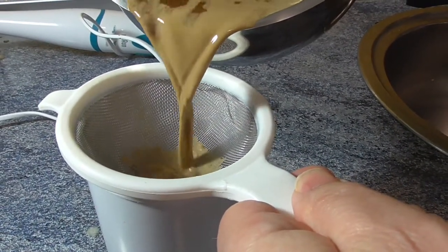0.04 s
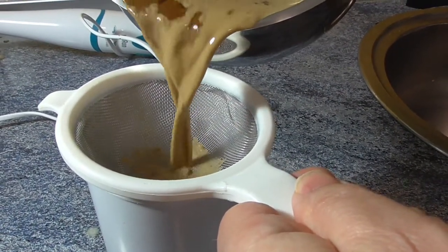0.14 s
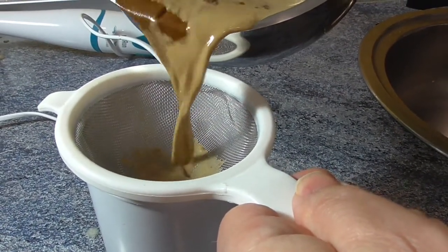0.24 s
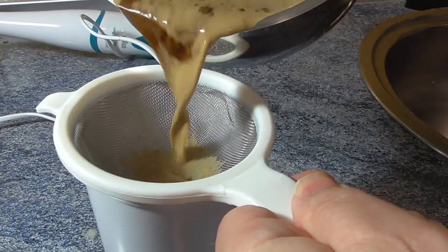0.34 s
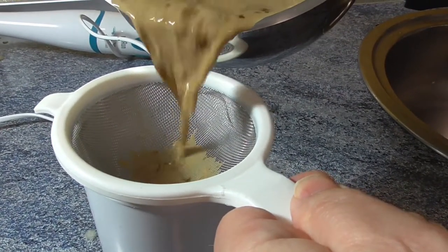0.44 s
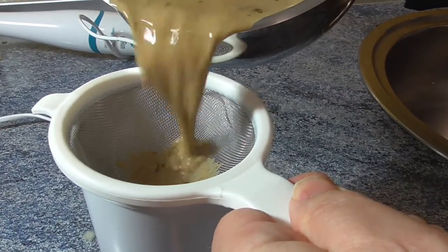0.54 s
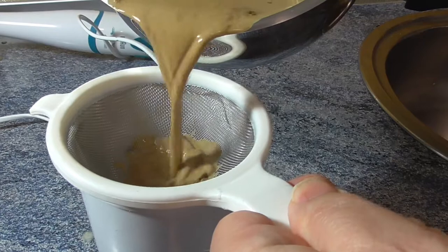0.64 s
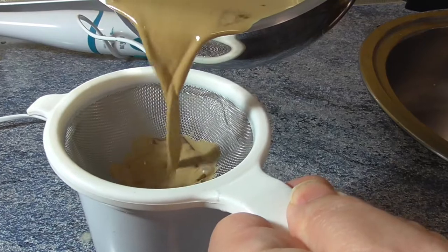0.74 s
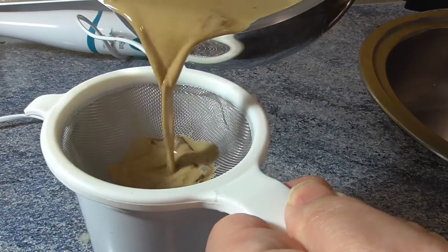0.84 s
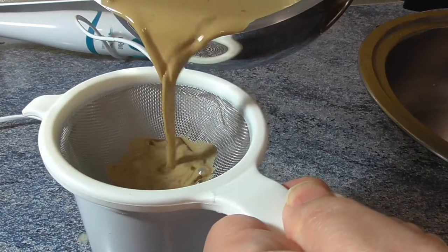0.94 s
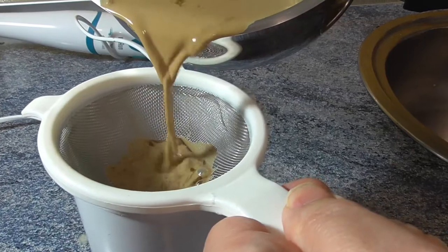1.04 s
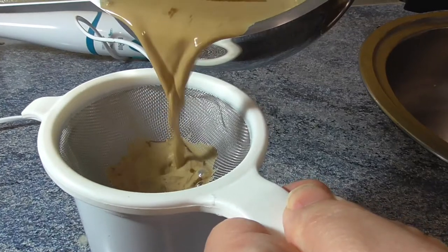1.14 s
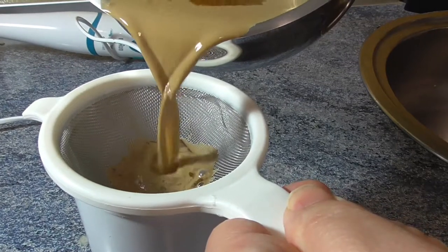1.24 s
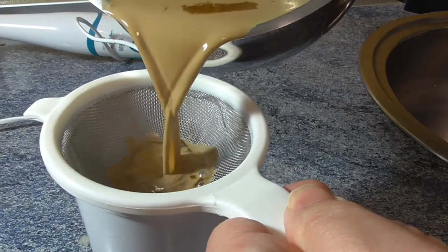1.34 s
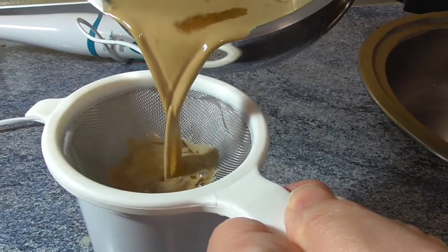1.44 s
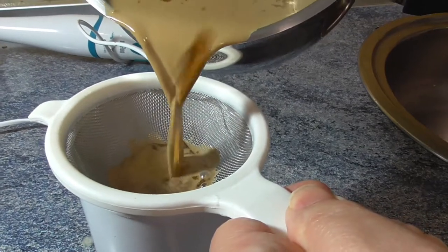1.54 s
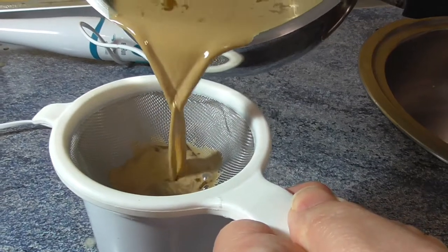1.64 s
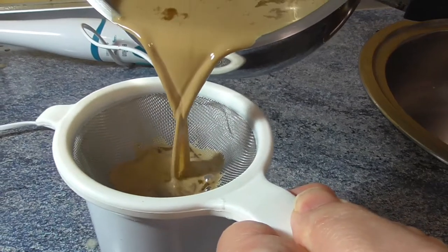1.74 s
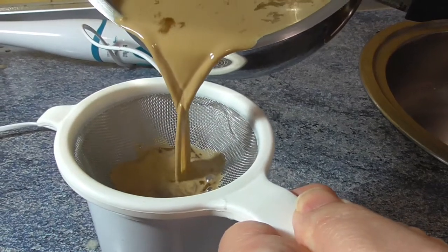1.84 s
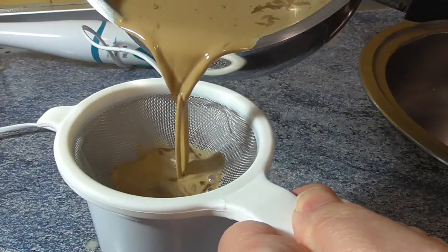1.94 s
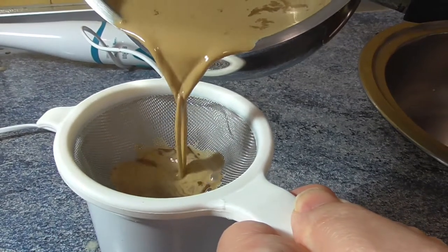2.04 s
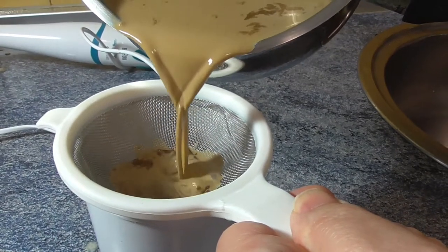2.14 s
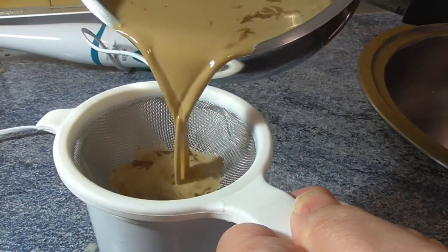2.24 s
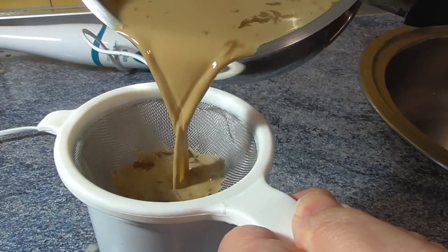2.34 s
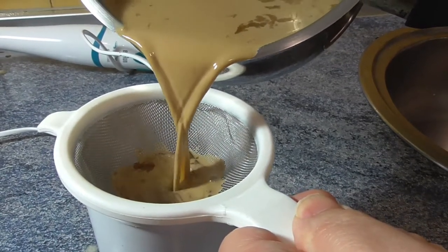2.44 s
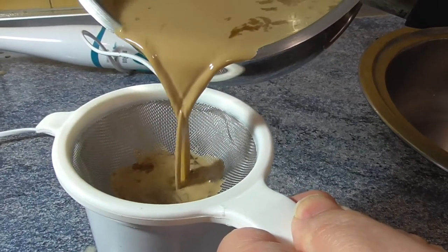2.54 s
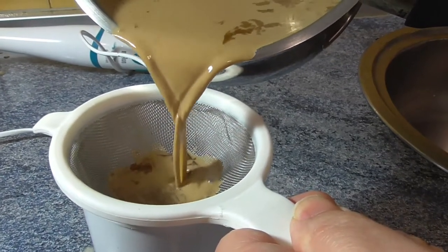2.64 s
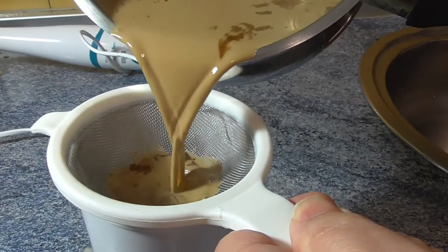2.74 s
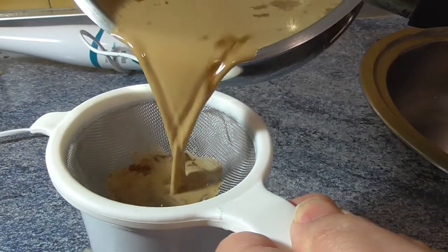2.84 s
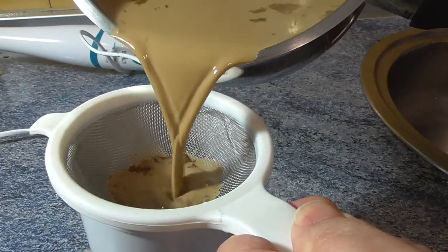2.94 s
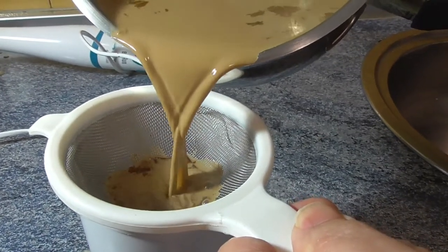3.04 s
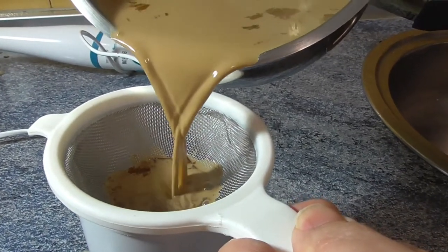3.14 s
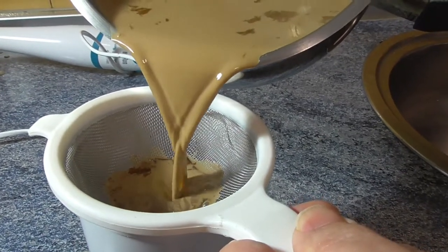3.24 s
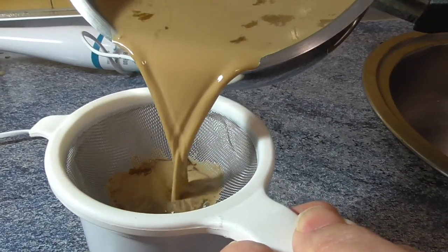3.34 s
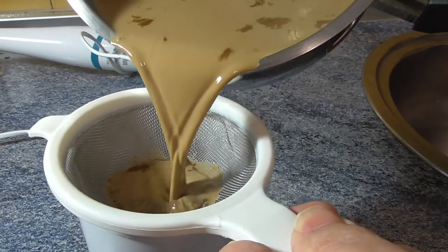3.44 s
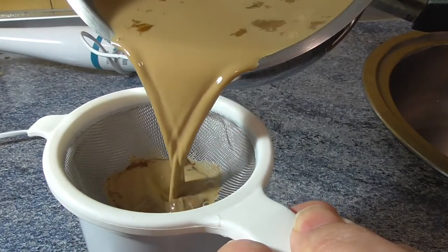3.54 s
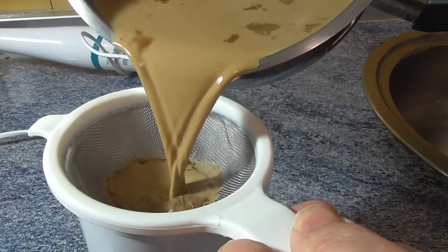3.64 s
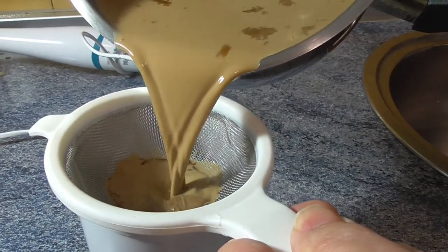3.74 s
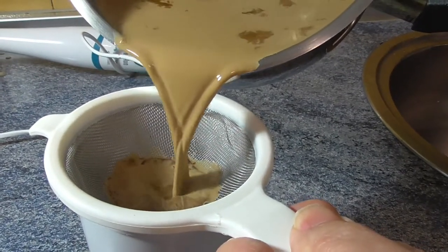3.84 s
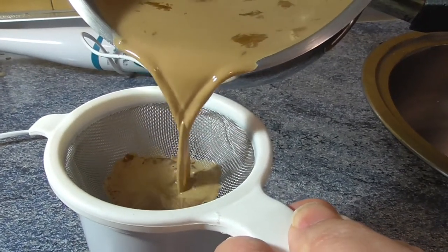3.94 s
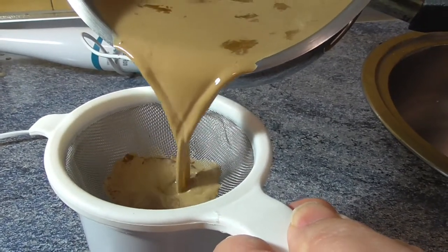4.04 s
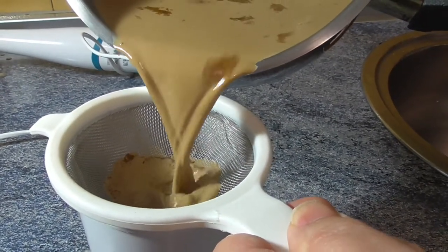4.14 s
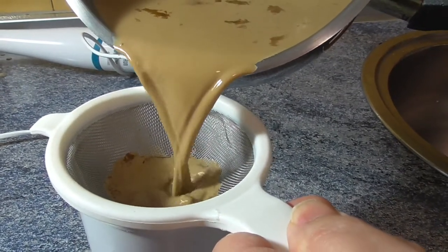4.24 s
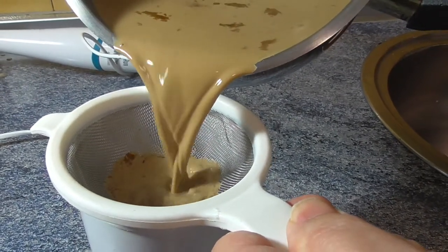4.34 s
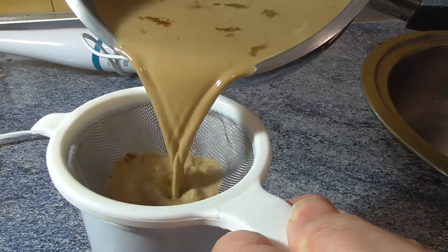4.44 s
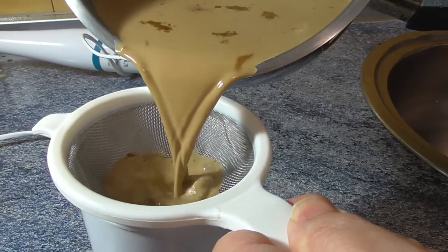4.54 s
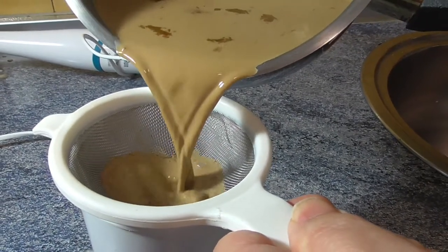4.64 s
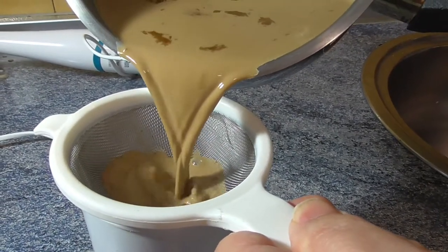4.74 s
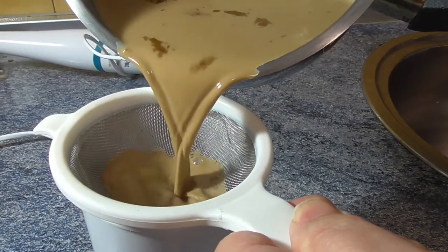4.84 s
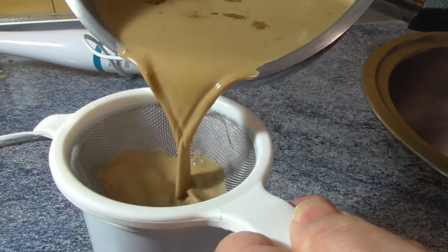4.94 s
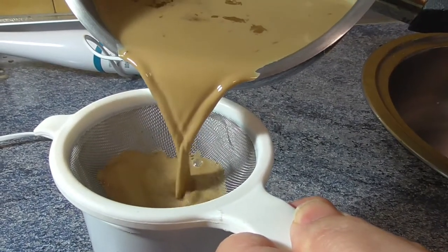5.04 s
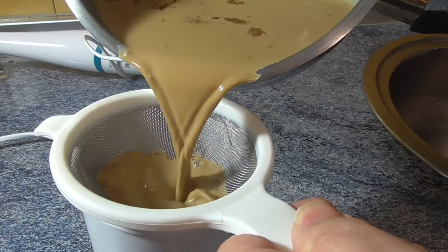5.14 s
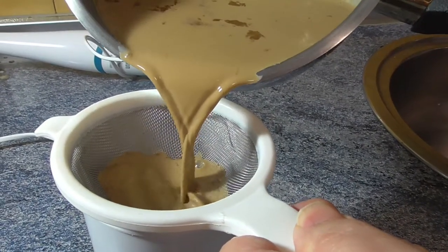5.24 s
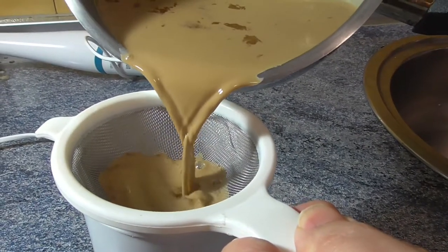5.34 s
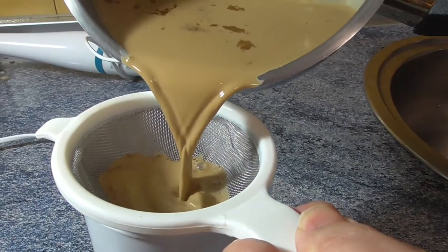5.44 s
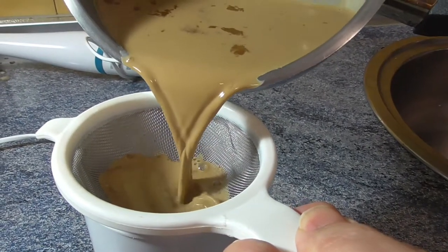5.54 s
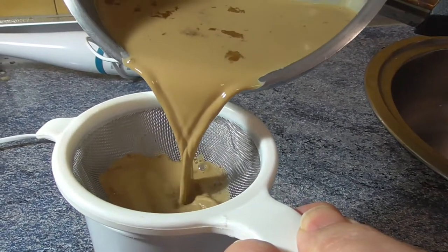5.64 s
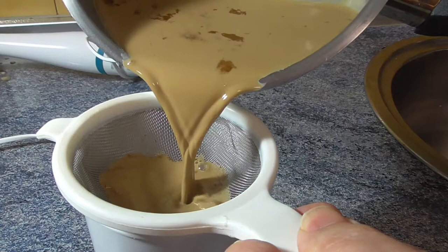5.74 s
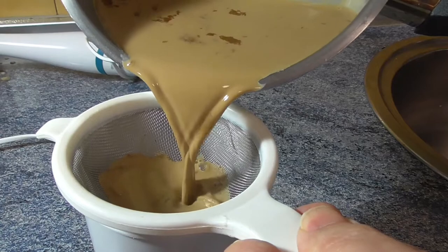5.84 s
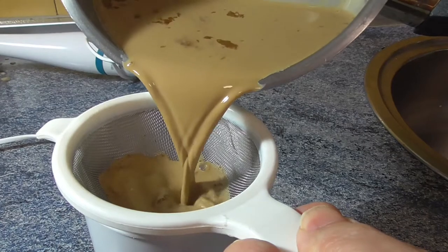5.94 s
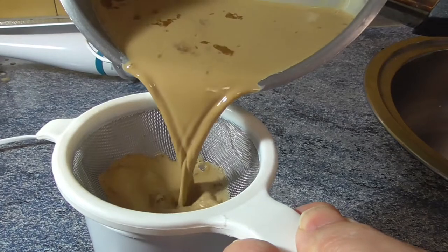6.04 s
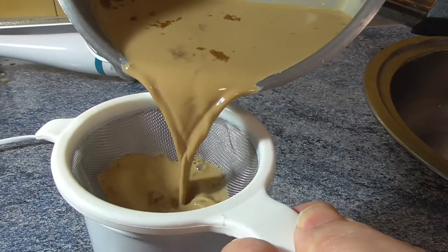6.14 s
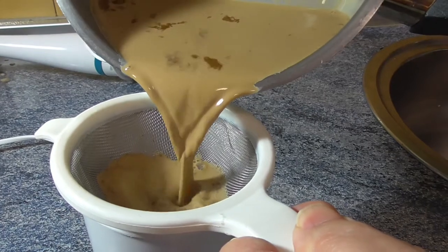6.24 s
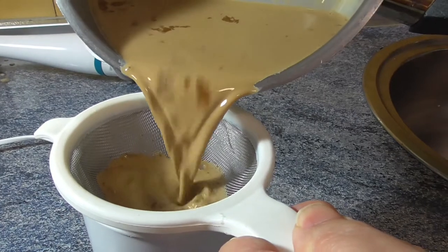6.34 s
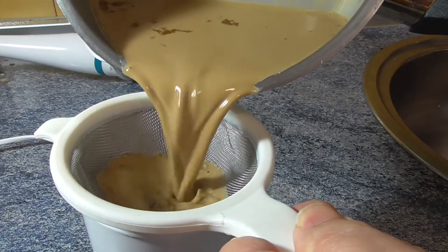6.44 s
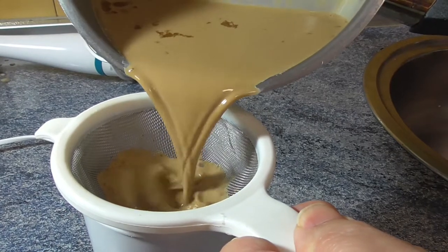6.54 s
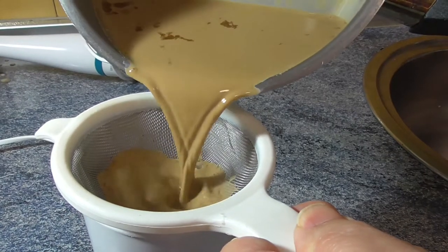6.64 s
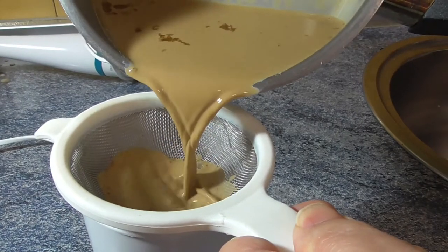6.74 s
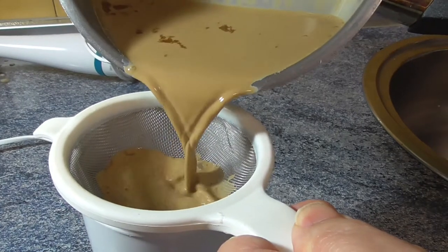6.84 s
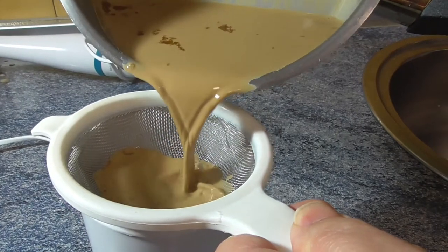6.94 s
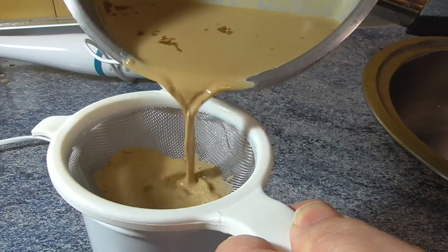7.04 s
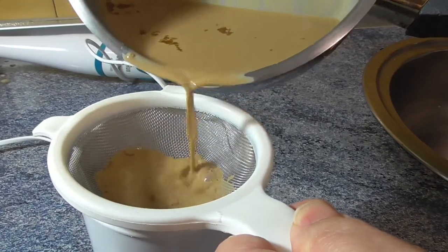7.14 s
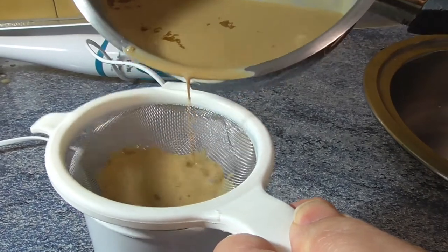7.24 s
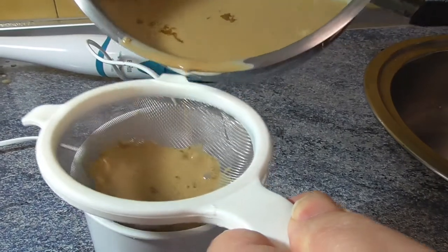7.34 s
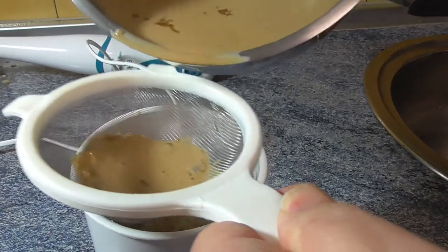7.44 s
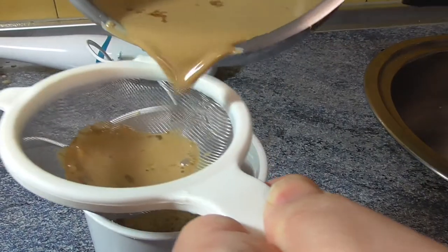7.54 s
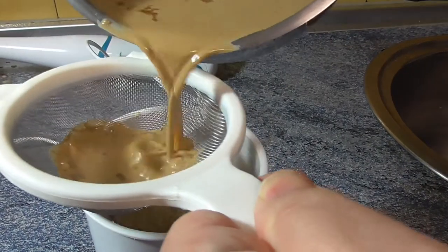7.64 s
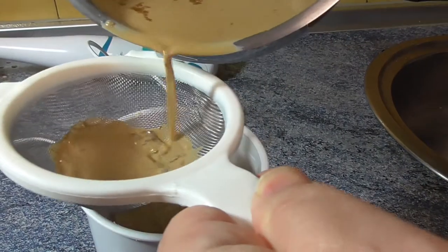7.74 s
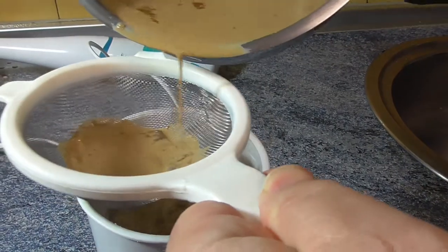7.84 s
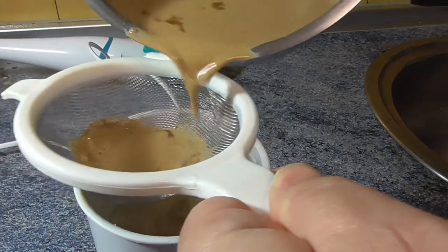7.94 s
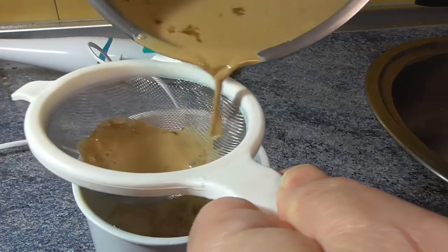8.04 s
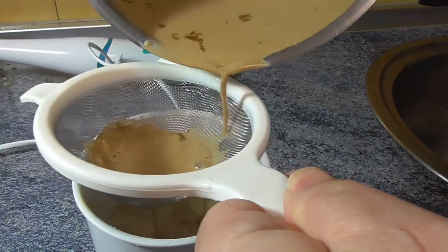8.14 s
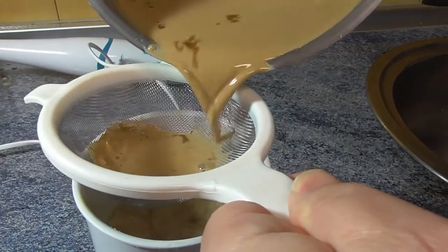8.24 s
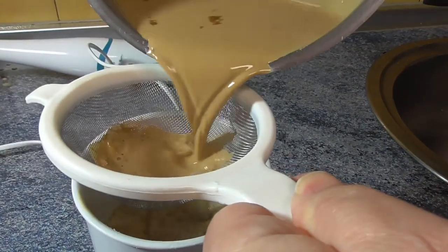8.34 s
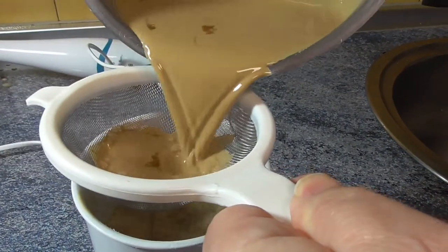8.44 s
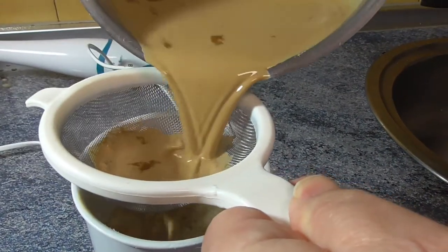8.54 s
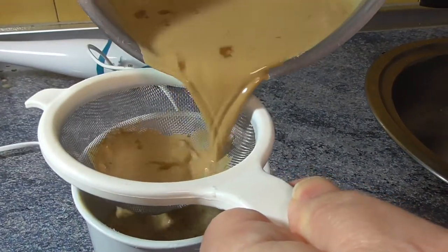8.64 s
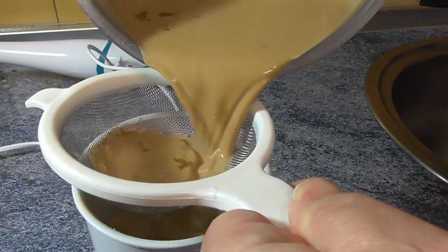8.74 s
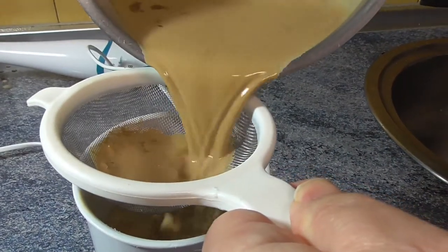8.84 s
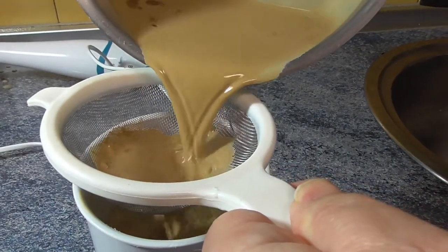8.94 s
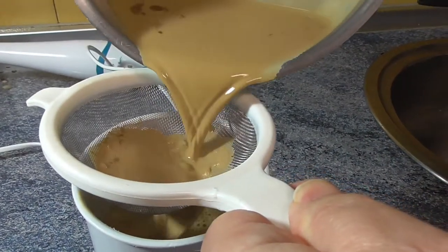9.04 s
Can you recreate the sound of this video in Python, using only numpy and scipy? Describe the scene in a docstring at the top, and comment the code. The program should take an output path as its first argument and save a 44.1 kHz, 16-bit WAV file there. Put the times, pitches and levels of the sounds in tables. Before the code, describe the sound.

Close-up kitchen pour: dense hollow plopping and bubbly crackle in a plastic jug thins out, nearly stops, then restarts with soft gulps.

```python
"""Drops patter and fine bubbles fizz as thick soup runs through a mesh strainer into a plastic jug.
Heavy blobs knock, ring base, wall and air column (struck modes) and thump the worktop.
As the jug fills, the base ring weakens and mostly sinks in pitch; bubbles tick in the mesh (short rings).
The strainer is lifted with a soft rumble (coloured noise); the pour restarts with gulps that slide down.
A short room echo and faint coloured noise lie around it all."""
import sys
import numpy as np
from scipy import signal
from scipy.fft import rfft, irfft
from scipy.io import wavfile
from scipy.ndimage import uniform_filter1d

SR = 44100
rng = np.random.default_rng(int(sys.argv[2]) if len(sys.argv) > 2 else 0)


def pcm_store(signal):
    """Save signal as 16-bit PCM."""
    levels = np.round(np.clip(np.atleast_2d(signal), -1, 1) * 32767)
    wavfile.write(sys.argv[1], SR, levels.astype(np.int16).T)


N = 401310
TOP_HZ = 16000
TIME_S = np.arange(N) / SR
AGE_S = np.arange(SR // 8) / SR  # time since a blow

# Levels are relative; some sources add a trim.
# small drops from the mesh: [t/s, level/dB]
PATTER_LEVEL = [(0, -34), (.25, -47), (.57, -38), (.73, -56.5), (.9, -44), (1.12, -42.5), (1.42, -57.5),
                (1.66, -44.5), (1.95, -51), (2.35, -48.5), (3.7, -46.5), (4.3, -57.5), (5.15, -56.5),
                (5.62, -61), (5.9, -58), (6.55, -74), (6.78, -54.5), (7.05, -62), (8.45, -61), (9.1, -44.5)]
# soup pressing through the mesh: [t/s, fizz level/dB]
FIZZ_LEVEL = [(0, -56), (.55, -50.5), (.73, -65.5), (.88, -56), (1.6, -61), (2.0, -69), (2.4, -58),
              (2.95, -63.5), (3.55, -56.5), (3.9, -58), (4.15, -71), (4.42, -62.5), (5.0, -73.5),
              (5.45, -65.5), (5.7, -78), (6.25, -71), (6.82, -63), (7.0, -73.5), (8.35, -76), (9.1, -57.5)]
# coarse bubbles where the soup lands: [t/s, level/dB]
GURGLE_LEVEL = [(0, -40.5), (.55, -49.5), (.73, -67), (.9, -44), (1.3, -46.5), (2.0, -48.5), (2.4, -51),
                (3.6, -46), (4.2, -55), (4.55, -50), (4.97, -51), (5.2, -48), (5.65, -59.5), (5.85, -55),
                (6.8, -55.5), (7.101, -58.5), (8.298, -62.5), (9.1, -51)]
# large blobs landing: [t/s, knock level/dB, hollow low ring level/dB, wet slap level/dB]
BLOBS = [(.0247, -29, -68, -36), (.1066, -25.5, -56, -58), (0.173, -31, -40, -38), (.226, -39, -53, -59),
         (.310, -36, -51, -38), (.3407, -27, -38, -32), (.3685, -27, -39.5, -42), (.4336, -20.5, -34, -43),
         (.485, -30.5, -59, -32.5), (.5154, -29.5, -61, -35), (.5634, -36.5, -58, -63),
         (.584, -31, -41, -40), (.630, -23, -39, -35.5), (.7745, -27, -38, -42.5),
         (.8184, -31.5, -38, -35.5), (0.865, -24, -37, -35), (.8945, -31, -50, -42),
         (0.928, -21, -35.5, -36), (.9707, -30.5, -61, -45), (1.0625, -31.5, -63, -37),
         (1.0863, -27, -49, -35.5), (1.1563, -19, -36.5, -44), (1.217, -30.5, -67, -57),
         (1.2873, -26.5, -40.5, -33.5), (1.3296, -29, -55, -62), (1.3843, -31.5, -46, -59),
         (1.476, -33, -48, -43), (1.519, -31.5, -42, -39), (1.552, -30.5, -42, -45),
         (1.5821, -23.5, -40, -63), (1.747, -32, -59, -48), (1.824, -36, -65, -38),
         (1.9576, -37.5, -46, -68), (2.072, -39.5, -55, -54), (2.1699, -30, -36.5, -39),
         (2.2626, -31, -44, -49), (2.297, -34, -43, -52), (2.314, -32.5, -40, -40),
         (2.432, -42.5, -62, -44), (2.5568, -28.5, -36.5, -41), (2.644, -36, -45, -46),
         (2.827, -26.5, -37.5, -39.5), (3.000, -35.5, -43, -43), (3.132, -29.5, -57, -44),
         (3.1728, -27.5, -35.5, -40), (3.64, -24.5, -32.5, -47), (3.850, -34, -42, -35),
         (3.939, -40, -60, -42), (3.981, -33.5, -37, -62), (4.048, -38.5, -66, -41), (4.096, -37, -42, -51),
         (4.164, -44, -50, -44.5), (4.211, -41.5, -48, -46), (4.240, -42, -51, -46), (4.555, -43, -47, -53),
         (4.794, -44, -44, -44.5), (4.8449, -33, -41, -35.5), (4.874, -35.5, -48, -54),
         (5.0156, -20.5, -32, -43.5), (5.047, -24.5, -35.5, -44.5), (5.105, -31.5, -39.5, -39.5),
         (5.147, -39.5, -54, -45), (5.337, -37, -42.5, -35), (5.376, -26, -34.5, -36.5),
         (5.699, -27.5, -36.5, -47.5), (5.7987, -33, -41, -45), (5.815, -32, -38.5, -49),
         (5.843, -33.5, -44, -41), (5.9145, -32, -37.5, -60), (5.984, -37.5, -48, -50),
         (6.2027, -29.5, -41, -36), (6.344, -31, -44, -35), (6.870, -42, -55, -45.5),
         (6.941, -27.5, -37, -48), (7.805, -46, -54, -51), (7.934, -40.5, -75, -48),
         (8.044, -41.5, -56, -68), (8.185, -42, -50, -53), (8.223, -35.5, -42, -56),
         (8.255, -35.5, -62, -58), (8.387, -38, -47, -38), (8.393, -36, -44, -40.5), (8.452, -35, -63, -58),
         (8.5449, -32.5, -41, -38.5), (8.639, -28.5, -42, -40.5), (8.668, -31, -38, -44),
         (8.731, -33, -50, -38.5), (8.843, -39.5, -40, -63), (8.923, -28, -41, -47),
         (8.9533, -35, -46, -40.5), (8.997, -35, -62, -58), (9.050, -26.5, -40, -32.5),
         (9.074, -28, -47, -31)]
# knock pitch, rising overall as the jug fills: [t/s, f/Hz]
KNOCK_PITCH = [(0, 683), (1.0, 660), (2.3, 767), (3.2, 770), (3.8, 880), (5.1, 793), (5.8, 844), (7, 990),
               (9.1, 1090)]
# jug as it fills: [t/s, air f/Hz, base f/Hz, base re knock/dB, wall re knock/dB,
#                   worktop thump re air ring/dB, knock time constant/ms]
JUG_FILL = [(0, 378.7, 679, 2, -7, -0.5, 0.56), (1.7, 362, 675.6, 2, -25, 0, 0.41),
            (2.8, 355, 667, -1.5, -42, -4, 0.4), (3.6, 335, 682, -6, -56, -4.5, 0.45),
            (5, 323, 610, -16.5, -58, -10, 0.51), (6.4, 309, 571, -19, -18, -12, 0.4),
            (6.9, 311, 590, -13, 1, -13.5, 0.34), (9.1, 309.4, 565, -11, 1, -10, 0.74)]
# knock bouncing between jug, pan and worktop: [delay/ms, level/dB]
BOUNCES = [(3.1, -4.5), (5.7, -8), (9.2, -48), (12, -10)]
# low resonances of the worktop: [f/Hz, t60/s, level/dB]
WORKTOP_MODES = [(121, 0.23, -4), (127.6, .13, 16.5), (153.3, 0.12, 12)]
# distinct bubble ticks in the mesh, loud ones and fainter ones in the quieter stretches:
# [t/s, level/dB, f/Hz]
TICKS = [(0.0868, -29, 9700), (0.206, -33, 9900), (.2266, -29, 9900), (.318, -36, 6080), (0.361, -32, 7900),
         (0.522, -33, 8850), (.610, -32.5, 8700), (0.634, -29.5, 10700), (.817, -35.5, 6750),
         (.864, -35.5, 9900), (1.043, -31.5, 7250), (1.247, -33.5, 10800), (1.354, -35.5, 9500),
         (1.546, -32.5, 8260), (1.6004, -23.5, 10700), (2.152, -43, 6950), (2.017, -50.5, 3480),
         (2.509, -35, 10100), (2.555, -25.5, 8440), (3.091, -31, 12500), (3.1742, -23.5, 13300),
         (3.316, -36, 9600), (3.537, -31, 8940), (3.697, -30, 8800), (3.875, -36.5, 8700),
         (3.912, -35.5, 13300), (3.983, -24, 8800), (4.164, -45, 12200), (4.267, -35.5, 7450),
         (4.277, -33, 9600), (4.325, -31.5, 8700), (4.398, -34.5, 9300), (4.427, -37.5, 7400),
         (4.448, -43, 7640), (4.4665, -43, 11700), (4.544, -50, 2080), (4.625, -49.5, 4300),
         (4.749, -39, 10500), (4.8, -40.5, 8700), (4.930, -41.5, 9100), (5.096, -43, 7600),
         (5.199, -47.5, 4250), (5.352, -38.5, 8050), (5.363, -35.5, 9400), (5.541, -43, 8340),
         (5.91, -30, 11800), (5.9137, -23.5, 8700), (6.131, -44, 8400), (6.2192, -34, 9800),
         (6.275, -42, 6950), (6.502, -45, 9700), (6.535, -40, 11100), (6.604, -37, 10000),
         (6.641, -43, 5050), (6.811, -37.5, 8300), (6.856, -43, 10900), (7.261, -38, 13000),
         (7.913, -42.5, 7950), (8.126, -43.5, 10600), (8.424, -48.5, 5650), (8.510, -52, 3600),
         (8.533, -42.5, 3900), (8.545, -43, 3800), (8.952, -44, 2450), (8.998, -31.5, 7900),
         (9.057, -30, 9000)]
# strainer being lifted: [t/s, rumble level/dB]
LIFT_LEVEL = [(7.25, -70), (7.285, -56.5), (7.39, -53.5), (7.44, -69), (7.5, -52), (7.6, -59), (7.7, -68),
              (7.8, -66)]
# thick gulps once the pour restarts: [t/s, level/dB, starting f/Hz]
GULPS = [(8.125, -46, 1140), (8.151, -40.5, 1106), (8.423, -40.5, 1150), (8.806, -35.5, 844),
         (8.895, -30, 793), (8.968, -37, 1310)]
# spectrum of the quiet kitchen: [f/Hz, level/dB per Hz]
QUIET_SPECTRUM = [(15, -44), (25, -16), (120, 5), (175, 2.5), (309, 4.5), (489, -3), (936, 0),
                  (1700, -17.5), (2110, -18.5), (2760, -21), (3920, -15.5), (6210, -22), (8360, -15),
                  (11600, -16.5), (16000, -26)]
# spectrum of fine bubbles in the mesh: [f/Hz, level/dB per Hz]
FIZZ_SPECTRUM = [(600, -24.5), (1300, 4), (1700, 0.5), (2100, -12), (2800, -5), (3600, -5), (5000, -1.5),
                 (6400, -4), (7200, 7), (7700, -0.5), (8400, 5.5), (11000, 1), (12500, 5), (16000, -16.5)]
# spectrum of coarse bubbles: [f/Hz, level/dB per Hz]
GURGLE_SPECTRUM = [(500, -7), (1200, -0.5), (1700, -11.5), (2100, -0.5), (2800, -12.5), (3600, -5.5),
                   (6000, -20), (16000, -32)]
# spectrum of wet slaps and spatter: [f/Hz, level/dB per Hz]
SLAP_SPECTRUM = [(700, -73), (1250, 19), (1750, -3), (2050, 9.5), (2400, 7.5), (2800, 1.5), (3600, 6.5),
                 (5500, 0.5), (8500, 5.5), (12500, 1.5), (16000, -21)]
# spectrum of the strainer's rumble: [f/Hz, level/dB per Hz]
RUMBLE_SPECTRUM = [(40, -24), (85, -2), (170, 0.5), (260, -8.5), (550, -12.5), (900, -18), (2000, -32)]


def undb(db):
    """Decibels to gain."""
    return 10 ** (np.asarray(db) / 20)


def curve(table, at_s):
    """Columns of a table of (t/s, ...) rows, interpolated at the given times."""
    t_s, *columns = np.transpose(table)
    return [np.interp(at_s, t_s, column) for column in columns]


def add(track, t_s, sound):
    """Mix a sound into a track from t_s on, cut at the track's end."""
    start = max(int(t_s * SR), 0)
    room_left = track[..., start:start + sound.shape[-1]]
    room_left += sound[..., :room_left.shape[-1]]


def peak(x):
    """Scale to a peak of 1."""
    return x / np.abs(x).max()


def steady(x, size=SR // 5):
    """Even out the level to an rms near 1, from power smoothed over 0.2 s, then 0.1 s."""
    power = uniform_filter1d(np.mean(np.atleast_2d(x) ** 2, axis=0), size)
    return x / np.sqrt(uniform_filter1d(power, size // 2) + 1e-12)


def colour(x, spectrum):
    """Minimum-phase filter with the given (f/Hz, level/dB) shape and unit power gain."""
    size = 4096
    hz, db = np.transpose(spectrum)
    bin_hz = np.arange(size // 2 + 1) * SR / size
    log_gain = np.log(undb(np.interp(np.log(bin_hz + 1), np.log(hz), db)))
    # fold the cepstrum to make the response causal
    cepstrum = irfft(log_gain)
    cepstrum[1:size // 2] *= 2
    cepstrum[size // 2 + 1:] = 0
    response = irfft(np.exp(rfft(cepstrum)))
    response /= np.linalg.norm(response)
    return signal.fftconvolve(np.atleast_2d(x), response[None], axes=1)[:, :N]


def mode(hz, t60_s, age_s=AGE_S):
    """One struck resonance: a sine losing 60 dB in t60_s."""
    return np.sin(2 * np.pi * hz * age_s) * np.exp(-np.log(1000) * age_s / t60_s)


def pan(x, left_over_right_db):
    """Place a sound by the level difference between left and right."""
    return x * undb(np.array([[left_over_right_db], [-left_over_right_db]]) / 2)


def wide_noise(size, side_db):
    """Two channels of noise: a common part and a weaker opposed part."""
    mid, side = rng.standard_normal((2, size))
    return mid + undb(side_db) * side * np.array([[1], [-1]])


def quiet(level_db=-62.5):
    """Steady coloured noise of the quiet kitchen, wide in stereo."""
    return colour(wide_noise(N, -1.9), QUIET_SPECTRUM) * undb(level_db)


def knock_pitch(t_s, stray):
    """Knock pitch in Hz at t_s, off the usual by a log ratio stray."""
    return curve(KNOCK_PITCH, t_s)[0] * np.exp(stray)


def plop(t_s, knock_hz, low_db, base_t60_s=0.067, air_t60_s=0.14, split=0.043, air_trim_db=-5.0,
         scatter=0.022, base_lag_s=0.0014, thump_rise_s=0.011, wall_hz=950,
         flex_hz=449.3, flex_t60_s=0.28, flex_db=-27):
    """One blob: a short knock with bounces excites base, sides and wall, then air column and worktop."""
    air_hz, base_hz, base_db, wall_db, thump_db, knock_ms = curve(JUG_FILL, t_s)
    base_detune, air_detune, board_detune, wall_detune = 1 + scatter * rng.standard_normal(4)

    push = AGE_S * 1000 / knock_ms
    direct = peak(push ** 2 * np.exp(-push) * np.sin(2 * np.pi * knock_hz * AGE_S))
    knock = direct.copy()
    for (delay_ms, db), stray in zip(BOUNCES, rng.standard_normal(len(BOUNCES))):
        add(knock, (delay_ms + 0.37 * stray) / 1000, undb(db) * direct)

    # two close modes of opposite sign: the base swells for a few cycles and dies quickly
    base_hz = base_hz * base_detune
    base = peak(mode(base_hz * (1 - split), base_t60_s) - mode(base_hz * (1 + split), base_t60_s))
    # the sides flex with a faint, longer note that weakens along with the base
    flex = undb(flex_db) * mode(flex_hz, flex_t60_s)
    add(knock, base_lag_s, undb(base_db) * (base + flex))

    swell = 1 - np.exp(-AGE_S / 0.00094)
    wall = peak(swell * mode(wall_hz * wall_detune, 0.045))
    air = peak(swell * mode(air_hz * air_detune, air_t60_s))
    # the heavy worktop takes a cycle or two to get going
    board = sum(undb(db) * mode(hz * board_detune, t60_s) for hz, t60_s, db in WORKTOP_MODES)
    thump = peak((1 - np.exp(-(AGE_S / thump_rise_s) ** 2)) * board)

    hollow = air + undb(thump_db) * thump
    return peak(knock + undb(wall_db) * wall) + undb(low_db + air_trim_db) * hollow


def patter(level_db, count=800, pitch_spread=0.075, low_db=-7, trim_db=-2, least_db=-15):
    """Small drops rain into the jug, knocking near the pitch of the large blobs around them."""
    out = np.zeros(N)
    for (when, size), pitch in zip(rng.random((count, 2)), rng.standard_normal(count)):
        t_s = when * N / SR
        knock_hz = np.clip(knock_pitch(t_s, pitch_spread * pitch), 500, 1150)
        add(out, t_s, undb(least_db * size) * plop(t_s, knock_hz, low_db))
    return pan(steady(out) * undb(level_db + trim_db), 1.24)


def crackle(count, spread_db, energy_fade_s, bunch_db, side_db):
    """Tiny films breaking: bunches of very short noise clicks, a few much louder than the rest."""
    energy, hold = np.zeros(N), SR // 60
    sizes = undb(spread_db * np.minimum(rng.exponential(size=count), 4))
    np.add.at(energy, rng.integers(0, N, count), sizes ** 2)
    fade = np.exp(-1 / (energy_fade_s * SR))
    envelope = np.sqrt(signal.lfilter([1], np.poly([fade, fade]), energy).clip(0))
    # level wanders at random, held and smoothed, so that clicks bunch
    held = np.repeat(rng.standard_normal(N // hold + 1), hold)
    bunches = uniform_filter1d(held, hold // 2)[:N]
    return envelope * undb(bunch_db * bunches) * wide_noise(N, side_db)


def fizz(fizz_db, gurgle_db, gurgle_trim_db=-13.0):
    """Fine bubbles break as soup is pressed through the mesh; coarser ones crackle where it lands."""
    fine = crackle(count=3600, spread_db=5, energy_fade_s=0.0004, bunch_db=5, side_db=-7)
    coarse = crackle(count=2600, spread_db=6.5, energy_fade_s=0.0016, bunch_db=4, side_db=-8)
    fine = steady(colour(fine, FIZZ_SPECTRUM)) * undb(fizz_db)
    coarse = steady(colour(coarse, GURGLE_SPECTRUM)) * undb(gurgle_db + gurgle_trim_db)
    return fine + pan(coarse, 2.0)


def bubble(hz, cycles, crack, sag_per_s=9, crack_s=0.00099, lag_s=0.000009):
    """A small bubble: its film cracks, then it rings with sagging pitch, a little apart in the channels."""
    age_s = AGE_S[:SR // 50]
    lag = lag_s * (1 + rng.standard_normal()) * np.array([[1], [0]])
    # cycles: length of the ring down to -60 dB
    ring = mode(hz * np.exp(-sag_per_s * age_s / 2), cycles / hz, age_s + lag)
    burst = wide_noise(len(age_s), -2.4) * np.exp(-age_s / crack_s)
    return (ring + crack * burst) * (1 - np.exp(-age_s / 0.0001))


def blips(fizz_db, gurgle_db, count=900, lowest_hz=1900, highest_hz=12000, spread_db=3.5,
          top_cycles=52, crack=0.14, trim_db=-3, large_trim_db=-16.5):
    """Whole bubbles ring at random: small, high ones in the mesh, large, low ones where the soup lands."""
    small, large = np.zeros((2, 2, N))
    for (when, height, place), size in zip(rng.random((count, 3)), rng.exponential(size=count)):
        hz = lowest_hz * (highest_hz / lowest_hz) ** height
        ring = bubble(hz, top_cycles * np.sqrt(hz / highest_hz), crack)
        ring = pan(undb(spread_db * min(size, 3)) * ring, 8 * (place - 0.5))
        add(small if height > 0.5 else large, when * N / SR, ring)
    small = colour(small, FIZZ_SPECTRUM)
    large = colour(large, GURGLE_SPECTRUM)
    small *= undb(fizz_db + trim_db) / np.std(small)
    large *= undb(gurgle_db + large_trim_db + trim_db) / np.std(large)
    return small + large


def small_ticks(fizz_db, count=45, centre_hz=8800, pitch_spread=0.17, over_fizz_db=16, spread_db=3,
                cycles=55, crack=0.097):
    """Further bubbles burst in the mesh at random, louder the more it fizzes."""
    out = np.zeros((2, N))
    for when, (pitch, size, place) in zip(rng.integers(0, N, count), rng.standard_normal((count, 3))):
        hz = min(centre_hz * np.exp(pitch_spread * pitch), TOP_HZ)
        gain = undb(fizz_db[when] + over_fizz_db + spread_db * size)
        add(out, when / SR, pan(gain * bubble(hz, cycles, crack), 2 * place))
    return out


def blobs(pitch_scatter=0.019, knock_trim_db=1, slap_trim_db=-3, slap_s=0.0023,
          spray_db=-17, spray_s=0.026):
    """Large blobs, a little to the left: a plop each, with a wet noise slap and a longer, weaker spray."""
    body, wet = np.zeros(N), np.zeros((2, N))
    decay = np.exp(-AGE_S / slap_s) + undb(spray_db) * np.exp(-AGE_S / spray_s)
    splash = decay * (1 - np.exp(-AGE_S / 0.00017))
    for t_s, db, low_db, wet_db in BLOBS:
        hz = knock_pitch(t_s, pitch_scatter * rng.standard_normal())
        add(body, t_s, undb(db + knock_trim_db) * plop(t_s, hz, low_db - db))
        add(wet, t_s, undb(wet_db + slap_trim_db) * splash * wide_noise(len(AGE_S), -10))
    return pan(body, 1.7) + pan(colour(wet, SLAP_SPECTRUM), 1.2)


def ticks(trim_db=4, cycles=55, crack=0.18, spatter_db=-14, spatter_s=0.004, lead_s=0.001):
    """Distinct bubbles, loud and faint, scattered across the strainer, each in a brief noise spatter."""
    out, spatter = np.zeros((2, 2, N))
    wrap = np.exp(-AGE_S / spatter_s) * (1 - np.exp(-AGE_S / lead_s))
    for t_s, db, hz in TICKS:
        ring = undb(db + trim_db) * bubble(hz, cycles, crack)
        add(out, t_s, pan(ring, 2 * rng.standard_normal()))
        add(spatter, t_s - lead_s, undb(db + spatter_db) * wrap * wide_noise(len(AGE_S), -46))
    return out + colour(spatter, SLAP_SPECTRUM)


def lift():
    """The plastic strainer rubs softly as it comes off the jug: low coloured noise."""
    return colour(wide_noise(N, -27), RUMBLE_SPECTRUM) * undb(curve(LIFT_LEVEL, TIME_S)[0])


def gulps(fall_s=0.0086, swell_s=0.0027, hollow_db=-8, air_t60_s=0.21, knock_db=-1):
    """An air pocket opens in the soup: its tone slides down to the jug's air column, which rings on."""
    out = np.zeros(N)
    for t_s, db, start_hz in GULPS:
        air_hz = curve(JUG_FILL, t_s)[0]
        hz = air_hz + (start_hz - air_hz) * np.exp(-AGE_S / fall_s)
        phase = 2 * np.pi * np.cumsum(hz) / SR
        slide = peak(AGE_S * np.exp(-AGE_S / swell_s) * np.sin(phase))
        hollow = peak((1 - np.exp(-AGE_S / swell_s)) * mode(air_hz, air_t60_s))
        knock = plop(t_s, start_hz, hollow_db)
        add(out, t_s, undb(db) * (slide + undb(hollow_db) * hollow + undb(knock_db) * knock))
    return pan(out, 1.9)


def kitchen(x, t60_s=0.38, low_db=-15, high_db=-17, corner_hz=1500):
    """Short, diffuse room echo: decaying noise, independent in the two channels."""
    age_s = np.arange(SR // 3) / SR
    envelope = np.exp(-np.log(1000) * age_s / t60_s) * (1 - np.exp(-age_s / 0.00078))
    tail = rng.standard_normal((2, len(age_s))) * envelope
    tail /= np.linalg.norm(tail, axis=1, keepdims=True)
    low = signal.sosfilt(signal.butter(1, corner_hz, fs=SR, output="sos"), tail)
    response = undb(low_db) * low + undb(high_db) * (tail - low)
    return signal.fftconvolve(x, response, axes=1)[:, :N]


def scene():
    """The pour, its echo and the quiet of the kitchen."""
    patter_db = curve(PATTER_LEVEL, TIME_S)[0]
    fizz_db = curve(FIZZ_LEVEL, TIME_S)[0]
    gurgle_db = curve(GURGLE_LEVEL, TIME_S)[0]
    bubbles = fizz(fizz_db, gurgle_db) + blips(fizz_db, gurgle_db) + small_ticks(fizz_db) + ticks()
    pour = patter(patter_db) + bubbles + blobs() + lift() + gulps()
    return pour + kitchen(pour) + quiet()


def record(dry):
    """Steep elliptic low-pass at TOP_HZ: the highest treble is cut."""
    return signal.sosfilt(signal.ellip(8, 0.2, 70, TOP_HZ, fs=SR, output="sos"), dry)


dry = scene()
out = record(dry)
pcm_store(out)
```